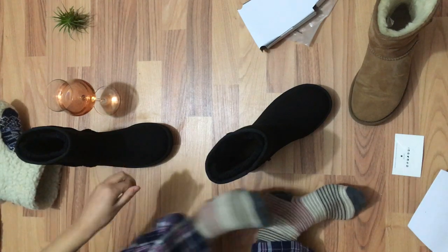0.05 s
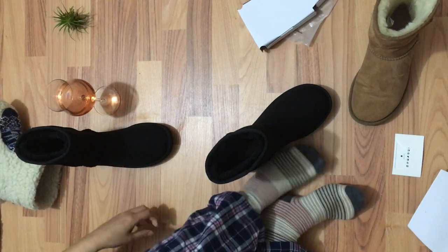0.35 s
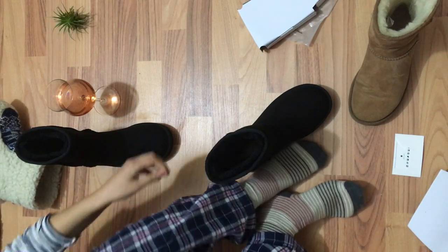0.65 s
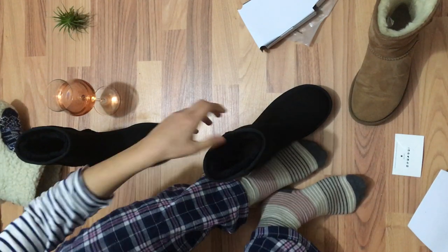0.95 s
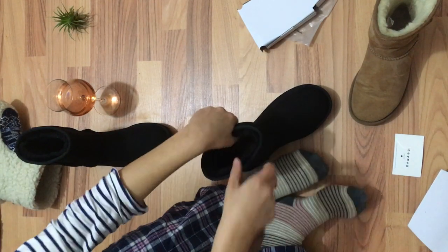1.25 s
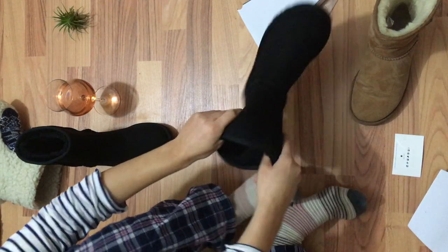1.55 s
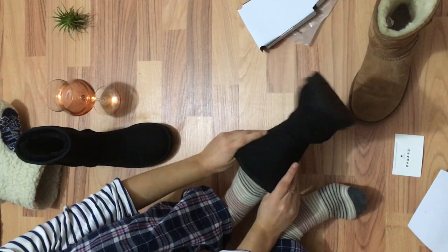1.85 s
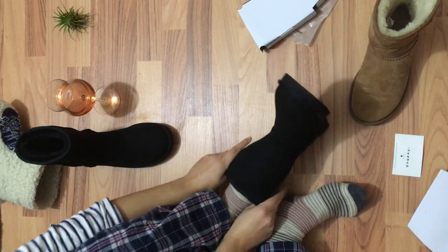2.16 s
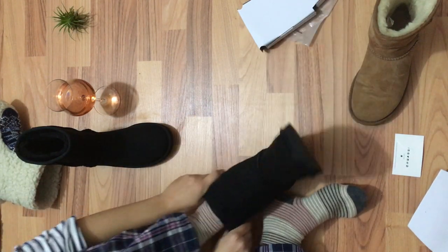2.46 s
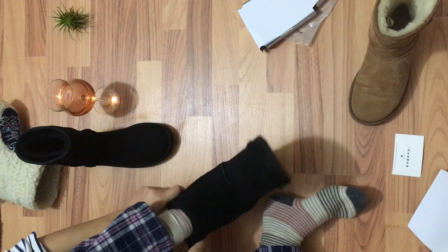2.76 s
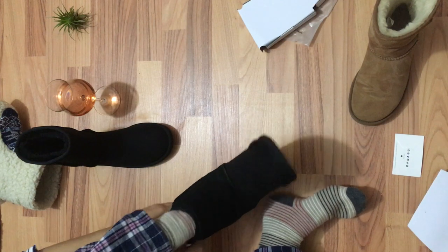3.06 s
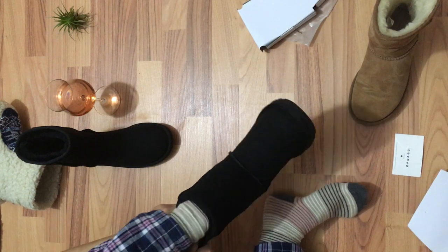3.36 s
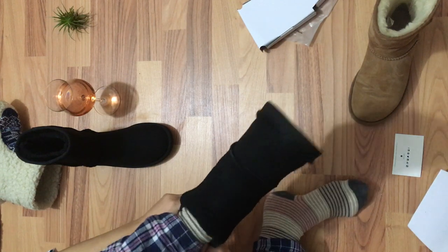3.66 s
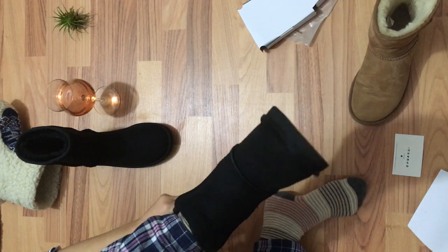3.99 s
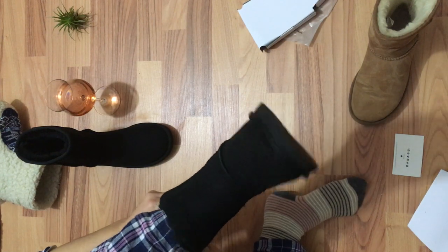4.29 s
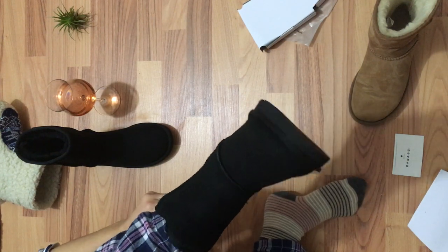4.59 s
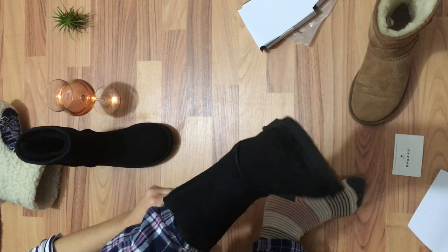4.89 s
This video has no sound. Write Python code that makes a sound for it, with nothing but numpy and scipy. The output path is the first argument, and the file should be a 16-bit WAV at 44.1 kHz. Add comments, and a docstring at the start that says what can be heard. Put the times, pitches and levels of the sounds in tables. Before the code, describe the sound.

A soft boot slides over a sock with quiet rustling strokes, a few light bumps and a single loud, booming thud on the floor.

```python
"""A soft sheepskin boot is picked up and pulled over a sock, close-miked in a quiet room.
Dull cloth and hissing fleece rub in strokes from the start, with small scuffs and light bumps.
Near 1.4 s the sole knocks the laminate floor; at 2.5 s the heel comes down hard and sets floor and room
booming. From 3.3 s the foot works down the snug shaft, rubbing even between strokes,
and a last light tap lands at 4.9 s."""
import sys
import numpy as np
from scipy import signal
from scipy.fft import rfft, irfft
from scipy.io import wavfile
from scipy.ndimage import uniform_filter1d

SR = 44100
rng = np.random.default_rng(int(sys.argv[2]) if len(sys.argv) > 2 else 0)


def file_out(sig):
    """Save sig as 16-bit WAV at sys.argv[1]."""
    # one column per channel
    cols = np.atleast_2d(sig).T
    # limit, then scale
    lim = np.clip(cols, -1, 1)
    pcm = np.round(lim * 32767).astype(np.int16)
    wavfile.write(sys.argv[1], SR, pcm)


N = 221852
T, HZ = np.arange(N) / SR, np.fft.rfftfreq(N, 1 / SR)
BOOM_HZ = 171  # the room's booming note

# Strokes of foot, hands and boot: peak_s, rise_s, fall_s, cloth_db, fleece_db
STROKES = [(0.005, 0.082, 0.11, -72, -72.2), (0.299, 0.13, 0.21, -65.5, -65.8),
           (0.392, 0.025, 0.23, -71, -70.5), (0.829, 0.081, 0.16, -59, -68.5),
           (1.446, 0.1, 0.11, -57.5, -64.5), (1.727, 0.09, 0.038, -66, -69), (1.892, 0.2, 0.16, -66, -64.2),
           (2.155, 0.075, 0.1, -60, -62), (2.256, 0.042, 0.11, -63.5, -61.5),
           (2.581, 0.066, 0.111, -69.5, -66.5), (2.682, 0.025, 0.085, -59.5, -59.5),
           (2.911, 0.023, 0.13, -62.5, -66), (3.044, 0.022, 0.091, -69, -62.5),
           (3.431, 0.043, 0.15, -59.5, -59), (3.719, 0.17, 0.091, -59.5, -58.5),
           (4.043, 0.23, 0.14, -62, -60.5), (4.359, 0.044, 0.14, -60.5, -56.5),
           (4.583, 0.11, 0.13, -66, -63.5), (4.874, 0.053, 0.12, -65, -60.5)]
# Stalls before the next pull: centre_s
STALLS = [.616, .734, 1.06, 2.041, 2.488, 3.33, 4.272, 4.798]
# Dull tone of rubbing cloth: freq_hz, level_db
CLOTH_EQ = [(60, -17), (170, 1.5), (330, -2.5), (800, -0.5), (1600, -0.5), (3000, -1.5), (6000, -6.5),
            (9000, -14), (16000, -17)]
# Bright hiss of sliding fleece: freq_hz, level_db
FLEECE_EQ = [(200, -26.5), (1500, -23), (3500, -8), (6000, 1.5), (9000, 2.5), (12500, 2), (16000, -3)]
# Foot and boot hitting the floor: start_s, level_db, lowpass_hz, push_db (relative to the hit)
KNOCKS = [ (0.002, -37.5, 200, 15.5), (0.4, -37.5, 1400, -8), (0.419, -41, 101, 28.5), (0.808, -40, 900, 0),
          (1.203, -40, 544, 3), (1.429, -20, 940, -3), (1.863, -32.5, 513, 8), (2.119, -22, 240, 8),
          (2.151, -29, 160, 14.5), (2.398, -35, 250, 13), (2.521, -15.5, 217, -19.5),
          (2.529, 0.5, 2530, -4), (3.708, -36.5, 2500, 3), (4.919, -34, 5000, 7)]
# Ringing notes of floor and room: pitch_hz, level_db, t60_s
MODES = [(56, -42, .65), (91, -29.5, 0.29), (122.2, -26, 0.22), (BOOM_HZ, -14, 0.44), (208, -39, 0.96),
         (227.5, -13, 0.17), (256, -30.5, .31), (287, -28, .31), (326, -27.5, .23), (381, -40, .28),
         (414, -36, .26), (555, -31, 0.17), (614, -39, 0.2), (697, -45, 0.28), (778, -50, .25),
         (855, -49, .26), (1048, -53, .25)]
# First thud through the boards: freq_hz, level_db
THUD_EQ = [(30, -54.5), (90, -9.5), (150, -2), (230, 5), (370, -9), (500, 1), (750, -12.5), (1250, -21),
           (1850, -52), (2700, -35), (4500, -54), (15000, -13.5)]
# Tone of the room's reverb: freq_hz, level_db
REVERB_EQ = [(40, -42), (150, -3), (290, -1.5), (390, 0.5), (520, -6), (800, -12.5), (1200, -20.5),
             (1800, -33.5), (2900, -25), (4500, -26.5), (15000, -13)]
# Decay of that reverb: freq_hz, t60_s
REVERB_DECAY = [(60, 0.93), (200, 0.72), (450, .32), (1100, 0.26), (3000, 0.23), (12000, 0.15)]
# Catches of boot and cloth; the narrowest are sock ribs zipping by:
# start_s, level_db, centre_hz, width_octaves, decay_s
SCUFFS = [ (0.395, -62, 1200, 0.73, 0.0088), (0.769, -66, 3200, 1.2, .04), (1.084, -68, 11000, .5, 0.026),
          (1.428, -46, 346, 0.47, 0.05), (1.438, -57, 12000, 0.58, 0.046), (1.738, -63, 656, 0.46, 0.033),
          (1.805, -57, 930, 0.29, 0.014), (1.8, -61, 9500, .4, .014), (1.903, -69, 6400, .07, 0.045),
          (2.17, -57, 640, 0.82, 0.11), (2.274, -64, 5800, 0.12, 0.047), (2.529, -47, 2760, 0.34, 0.0064),
          (2.686, -50.5, 13500, 0.5, 0.032), (2.686, -55, 790, 0.76, 0.088), (2.903, -61, 12500, .4, .025),
          (3.255, -54.5, 11960, 0.68, 0.0055), (3.405, -60, 3000, 1.3, 0.035),
          (3.708, -54.5, 980, 0.73, 0.027), (4.018, -60.5, 600, 0.95, 0.034),
          (4.03, -66.5, 4350, .06, 0.13), (4.446, -57, 543, 0.22, 0.0084), (4.519, -58.5, 4900, .8, 0.011),
          (4.733, -56.5, 4860, 0.71, 0.037), (4.915, -57.5, 1430, 0.8, 0.019)]
# Quiet room and microphone hiss: freq_hz, level_db
ROOM_TONE_EQ = [(20, -37), (38, 0.5), (55, 7), (90, 0.5), (130, -7.5), (300, -6.5), (600, -15), (1500, -22),
                (4000, -20), (9000, -22.5), (15500, -17.5)]
# Dips cut by the microphone port: centre_hz, width_hz, gain_db
PORT_NOTCHES = [(4890, 440, -2.5), (7730, 570, -3), (10440, 360, -4.5)]


def rubbing():
    """Each stroke slides the fleece, which drags the cloth after it; the grip is never quite even."""
    snug_span_s, snug_fade_s, cloth_lag_s = (3.33, 4.13), 1.34, 0.008
    snug = np.exp(-((T - np.clip(T, *snug_span_s)) / snug_fade_s) ** 2)
    # Clothes never lie quite still, and the lining rubs on while the foot is in the snug shaft.
    cloth_power = amp(-82.5) ** 2 + (amp(-68) * snug) ** 2
    fleece_power = amp(-86) ** 2 + (amp(-70) * snug) ** 2
    for peak_s, rise_s, fall_s, cloth_db, fleece_db in STROKES:
        cloth_power += (amp(cloth_db) * swell(peak_s + cloth_lag_s, rise_s, fall_s)) ** 2
        fleece_power += (amp(fleece_db) * swell(peak_s, rise_s, fall_s)) ** 2
    stall_depth_db, stall_width_s = -4.5, 0.021
    stall_db = stall_depth_db * sum(np.exp(-((T - s) / stall_width_s) ** 2) for s in STALLS)
    grip = wander(rate_hz=18)
    cloth = coloured(fibres(snags_per_s=840, snag_db=-8.5), CLOTH_EQ)
    cloth = patchy_rub(cloth, depth_db=1.92)
    cloth *= np.sqrt(cloth_power) * amp(stall_db + 0.57 * grip)
    fleece = coloured(fibres(snags_per_s=450, snag_db=-12), FLEECE_EQ)
    fleece = patchy_rub(fleece, depth_db=1.0)
    fleece *= np.sqrt(fleece_power) * amp(stall_db + 0.5 * grip)
    return cloth + fleece


def swell(peak_s, rise_s, fall_s):
    """A stroke speeds up to a pointed peak, then rounds off as it slows."""
    away_s = abs(T - peak_s)
    return np.exp(-np.where(T < peak_s, (away_s / rise_s) ** 1.26, (away_s / fall_s) ** 2.15))


def fibres(snags_per_s, snag_db):
    """Countless tiny fibre slips blur into hiss, with sparser snags of uneven size."""
    snags = rng.standard_normal(N) * (rng.random(N) < snags_per_s / SR)
    snags *= amp(-np.minimum(rng.exponential(1, N), 4))
    return rng.standard_normal(N) + amp(snag_db) * unit_rms(snags)


def patchy_rub(rub, depth_db):
    """Narrow bands of the rubbing swell and fade at random."""
    bands = signal.stft(rub, SR, nperseg=512)[2]
    patches = uniform_filter1d(rng.standard_normal(bands.shape), size=4, axis=0)  # smooth in frequency
    patches = unit_rms(uniform_filter1d(patches, size=18, axis=1))  # and in time
    return unit_rms(signal.istft(bands * amp(depth_db * patches), SR, nperseg=512)[1][:N])


def floor_knocks():
    """Each hit layers a thud, two wall echoes, ringing modes and reverb over a deep push."""
    t, out = T[:SR], np.zeros(N)
    thud = amp(-5.5) * board_thud(lag_at_1khz_s=0.001)
    ring = sum(amp(db - 60 * t / t60_s) * np.sin(2 * np.pi * hz * t) for hz, db, t60_s in MODES)
    ring *= 1 - np.exp(-(t / 0.0026) ** 2)  # standing waves need a few crossings to build
    weight = amp(-32.5) * (t / 0.012) * np.exp(1 - t / 0.012)  # the leg loads the boards and lets go
    for start_s, level_db, lowpass_hz, push_db in KNOCKS:
        ring_db = -1.5 + 0.26 * level_db  # a harder hit sets more of the floor going
        push_hz = 98.7 * 2 ** (level_db / 43.5)  # and stiffens the sole, raising the pitch
        knock = amp(-28.5) * room_reverb()
        add(knock, 0.002, amp(ring_db) * ring)
        for delay_s, gain_db in [(0, 1.5), (0.0135, -24), (0.0305, -14)]:
            add(knock, delay_s, amp(gain_db) * thud)
        knock = signal.lfilter(*signal.butter(2, lowpass_hz, fs=SR), knock)  # soft contact dulls it
        push = amp(push_db) * weight * np.sin(2 * np.pi * push_hz * t)
        add(out, start_s, amp(level_db) * (knock + push))
    return out


def board_thud(lag_at_1khz_s, size=8192):
    """A bending wave crosses the boards: treble arrives first, so the thud falls in pitch."""
    hz = abs(np.fft.fftfreq(size, 1 / SR))
    log_gain = np.log(amp(curve_at(THUD_EQ, hz)))
    log_spectrum = np.conj(signal.hilbert(log_gain))  # minimum phase keeps the attack tight
    bending_phase = 4 * np.pi * lag_at_1khz_s * np.sqrt(1000 * hz)
    wave = irfft(np.exp(log_spectrum - 1j * bending_phase)[:size // 2 + 1])
    return wave / abs(wave).max()


def scuffs():
    """Boot and cloth catch and let go: a burst of slips with a fast attack and a fading tail."""
    out = np.zeros(N)
    for start_s, level_db, centre_hz, width_octaves, decay_s in SCUFFS:
        band = np.exp(-0.5 * (np.log2((HZ + 1) / centre_hz) / width_octaves) ** 2)
        slips = filtered_noise(band)[:SR // 2]
        age = T[:SR // 2] / decay_s
        attack = 1 - np.exp(-age / 0.04)
        add(out, start_s, amp(level_db) * slips * attack * np.exp(-age))
    return out


def room_reverb():
    """Dense reflections bloom, then each band dies at its own speed."""
    noise = coloured(rng.standard_normal(N), REVERB_EQ)[:SR]
    hz, t, bands = signal.stft(noise, SR, nperseg=512)
    decay = amp(-60 * t / curve_at(REVERB_DECAY, hz)[:, None])
    tail = signal.istft(bands * decay, SR, nperseg=512)[1][:SR]
    return tail * (1 - np.exp(-(T[:SR] / 0.0051) ** 2))


def room_murmur():
    """The room's low note comes and goes faintly under the action."""
    return amp(-80) * wander(rate_hz=5.4) * np.sin(2 * np.pi * BOOM_HZ * T)


def room_tone():
    """A bed of still air and microphone hiss, with a low hum wavering in pitch and level."""
    hum_hz = 59.2 + 2.5 * wander(rate_hz=4.6)
    waver_db = 2.2 * wander(rate_hz=5)
    hum = np.sqrt(2) * np.sin(2 * np.pi * np.cumsum(hum_hz) / SR) * amp(waver_db)
    air = coloured(rng.standard_normal(N), ROOM_TONE_EQ)
    return amp(-66.5) * air + amp(-73.5) * hum


def amp(db):
    """Decibels to gain."""
    return 10 ** (np.asarray(db) / 20)


def unit_rms(x):
    """Normalises to rms 1."""
    return x / np.sqrt(np.mean(x ** 2) + 1e-20)


def curve_at(points, hz):
    """Reads a curve on a log-frequency axis."""
    freq_hz, value = np.transpose(points)
    return np.interp(np.log(hz + 1), np.log(freq_hz + 1), value)


def add(mix, start_s, sound):
    """Drops a sound into the mix at start_s."""
    part = mix[round(start_s * SR):][:len(sound)]
    part += sound[:len(part)]


def coloured(x, eq):
    """Runs x through an EQ curve, at rms 1."""
    return unit_rms(irfft(rfft(x) * amp(curve_at(eq, HZ)), N))


def filtered_noise(gain):
    """Noise shaped by a gain per frequency, at rms 1."""
    return unit_rms(irfft(rfft(rng.standard_normal(N)) * gain, N))


def wander(rate_hz):
    """Slow random modulation, at rms 1."""
    return filtered_noise(1 / (1 + (HZ / rate_hz) ** 2))


def scene():
    """All layers in one mono mix."""
    return (rubbing() + room_murmur() + scuffs() + floor_knocks() + room_tone())[None]


def record(dry):
    """The microphone sheds the sub-bass, its port cuts three shallow notches, and the top is cut off."""
    low_cut_hz, high_cut_hz = 38, 15860
    port = amp(sum(db * np.exp(-((HZ - hz) / width_hz) ** 2) for hz, width_hz, db in PORT_NOTCHES))
    low_cut = 1 / (1 + (low_cut_hz / (HZ + 1)) ** 8)
    high_cut = signal.firwin(801, high_cut_hz, window=("kaiser", 9), fs=SR)
    heard = irfft(rfft(dry) * port * low_cut, N)
    return signal.oaconvolve(heard, high_cut[None], "same")


dry = scene()
out = record(dry)
file_out(out)
```